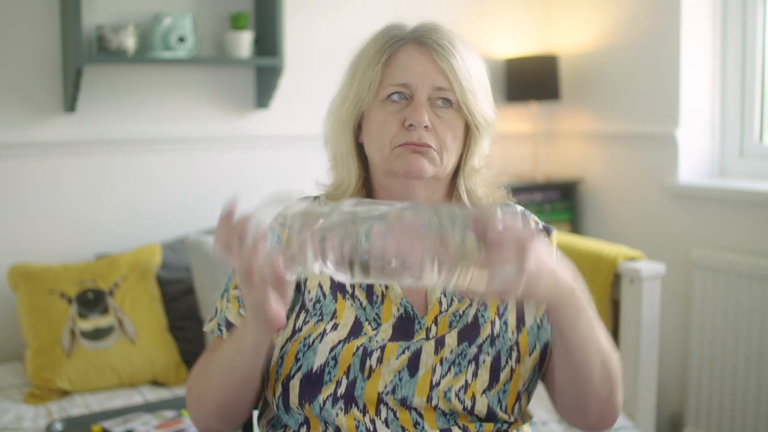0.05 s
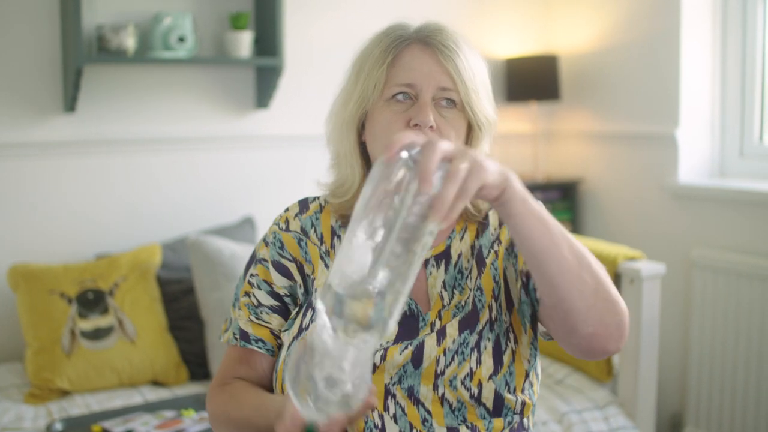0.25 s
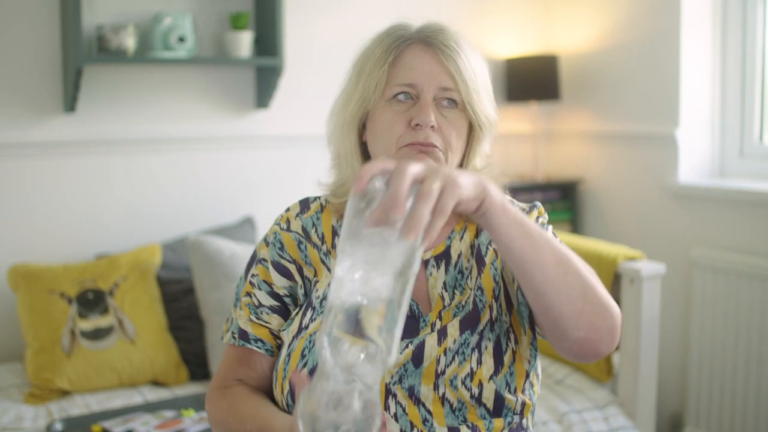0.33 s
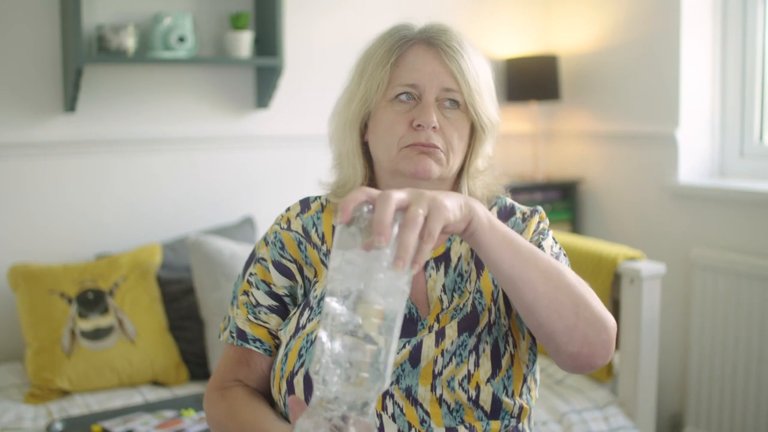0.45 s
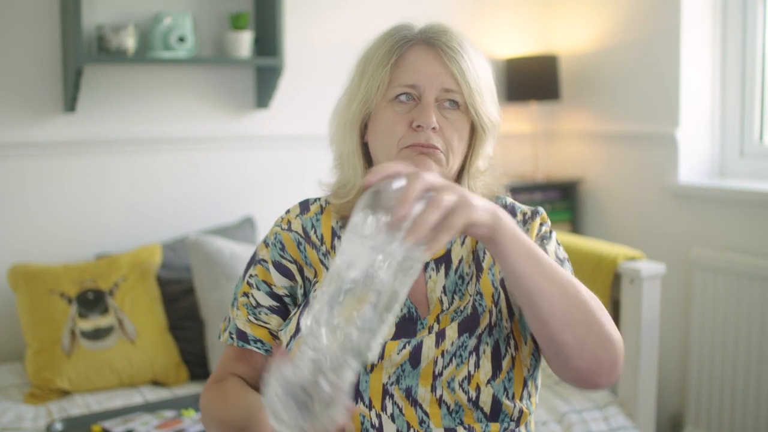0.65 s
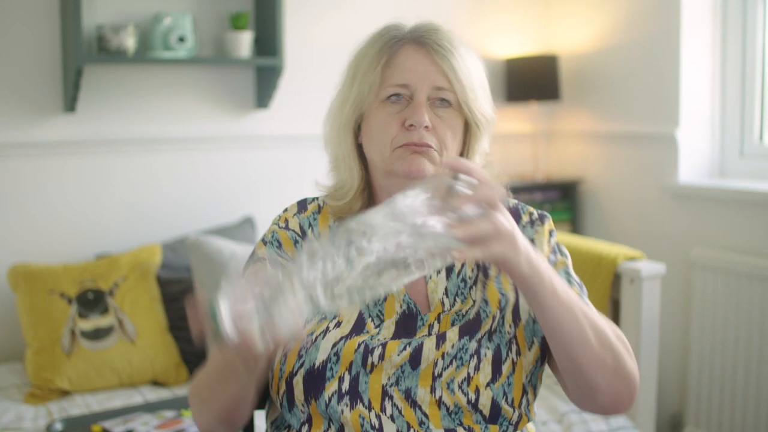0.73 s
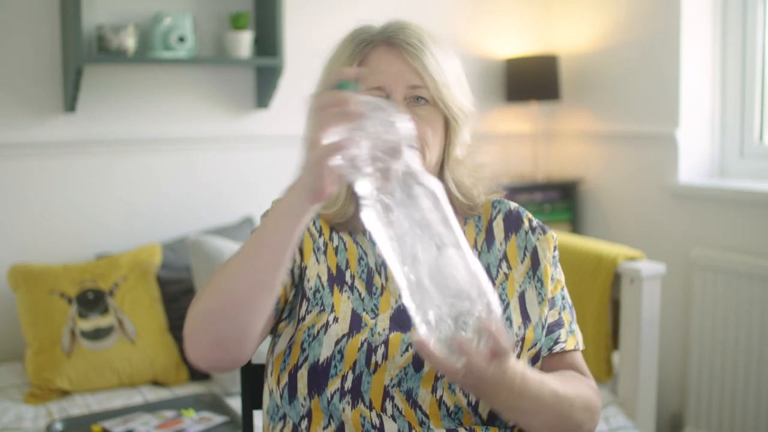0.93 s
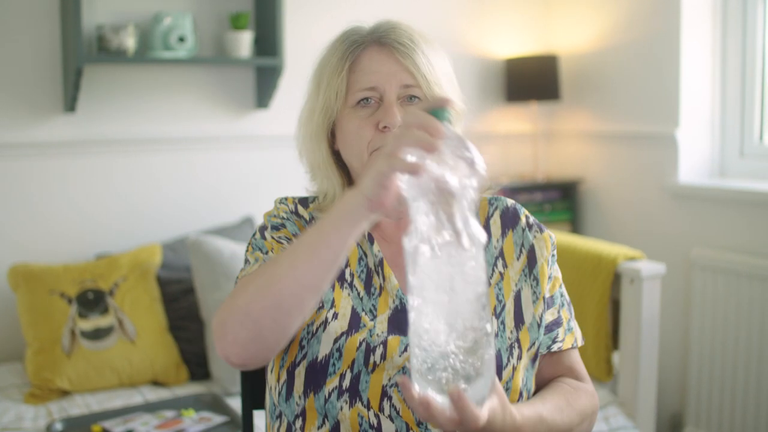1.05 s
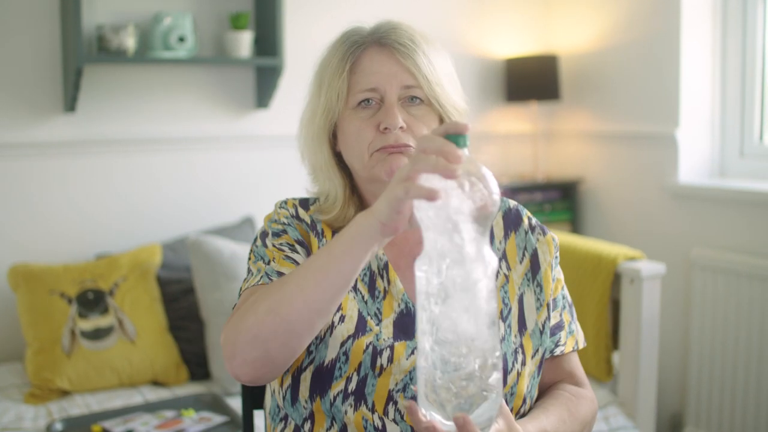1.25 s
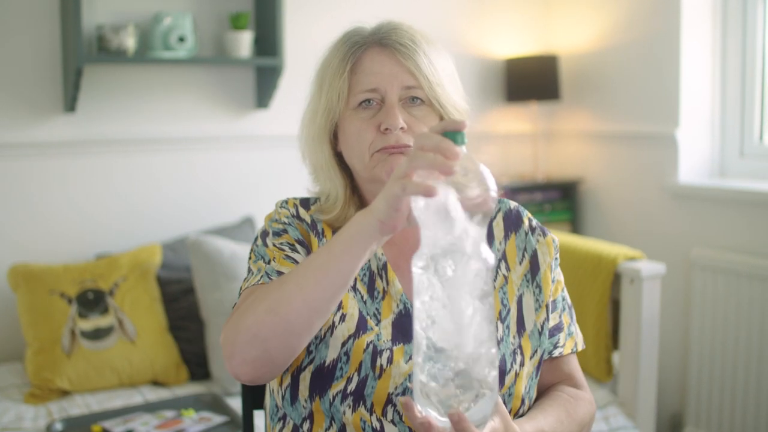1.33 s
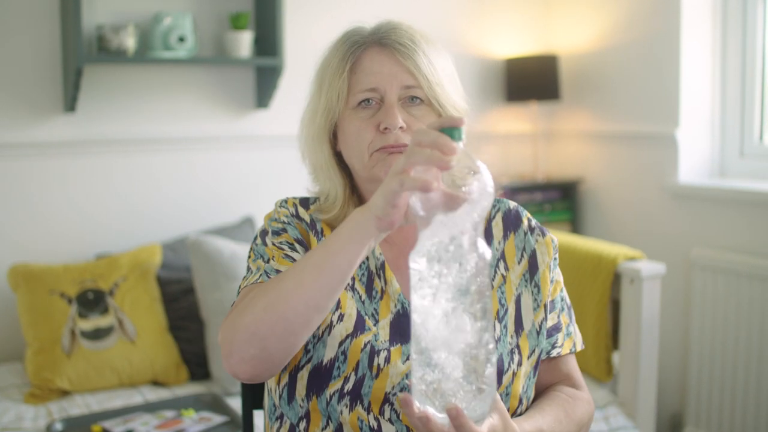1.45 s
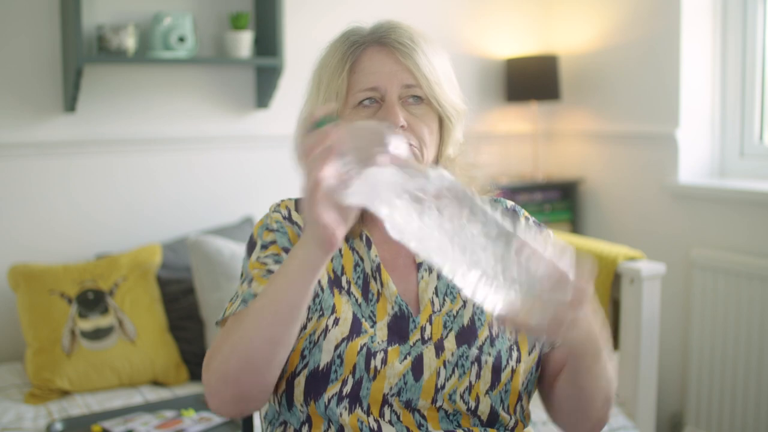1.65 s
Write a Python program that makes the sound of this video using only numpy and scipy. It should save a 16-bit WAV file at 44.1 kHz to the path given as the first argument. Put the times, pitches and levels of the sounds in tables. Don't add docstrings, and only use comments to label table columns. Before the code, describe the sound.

Water surges inside a large flimsy bottle, opening with a strong slosh and loud plastic crack, easing to small bubbles, then surging again in quick bursts before fading to faint room tone, heard close and fairly dry.

```python
import sys
import numpy as np
from scipy import signal
from scipy.fft import rfft, irfft
from scipy.io import wavfile
from scipy.ndimage import uniform_filter1d

SR = 44100
rng = np.random.default_rng(int(sys.argv[2]) if len(sys.argv) > 2 else 0)


def convert_level_to_amplitude(level_db):
    exponent = np.asarray(level_db, float) / 20
    return 10 ** exponent


def persist_wave(psi):
    counts = np.round(np.clip(psi, -1, 1) * 32767).astype(np.int16)
    wavfile.write(sys.argv[1], SR, np.atleast_2d(counts).T)


N = 74970

# (frequency [Hz], level [dB])
WALL_MODES = [(250, -9.5), (322, 3.5), (414, 3), (472, 1), (590, -5.5), (760, -3.5), (960, 2), (1200, 0)]


def evened(x):
    return x / np.sqrt(np.mean(x ** 2) + 1e-20)


def add(mix, s, sound):
    part = mix[max(round(s * SR), 0):][:len(sound)]
    part += sound[:len(part)]


def read(points, hz):
    f, db = np.transpose(points)
    return np.interp(np.log(hz + 1), np.log(f + 1), db)


def coloured(points):
    spectrum = rfft(rng.standard_normal(N))
    gain = convert_level_to_amplitude(read(points, np.fft.rfftfreq(N, 1 / SR)))
    return evened(irfft(spectrum * gain, N))


def band(x, hz, width_hz):
    b, a = signal.iirpeak(hz, hz / width_hz, SR)
    return signal.lfilter(b, a, signal.lfilter(b, a, x))


def ring(hz, t60, rise=0., soft_s=0.0002):
    t = np.arange(4000) / SR
    envelope = (1 - np.exp(-t / soft_s)) * convert_level_to_amplitude(-60 * t / t60)
    creep = 1 + rise * np.minimum(t / t60, 1)
    return envelope * np.sin(2 * np.pi * hz * t * creep)


def train(per_s, spread_db):
    hits = rng.random(N) < per_s / SR
    size = convert_level_to_amplitude(spread_db * np.minimum(rng.exponential(1, N), 3.2))
    return hits * size * rng.choice([-1., 1.], N)


def clumps(db, size):
    wander = uniform_filter1d(uniform_filter1d(rng.standard_normal(N), size), size)
    return convert_level_to_amplitude(db * evened(wander))


def patchy(x):
    patch_db = 2.3
    z = signal.stft(x, nperseg=256, noverlap=192)[2]
    patches = uniform_filter1d(rng.standard_normal(z.shape), size=6, axis=0)
    patches = uniform_filter1d(patches, size=14, axis=1)
    return signal.istft(z * convert_level_to_amplitude(patch_db * evened(patches)), nperseg=256, noverlap=192)[1][:N]


def bump(s, length):
    return np.exp(-(2 * (np.arange(N) / SR - s) / length) ** 2)


def effort(column):
    # (peak time [s], rise [s], fall [s], spray level [dB], level of the weight on the wall [dB])
    surges = [(0.061, 0.14, 0.092, -62, -74), (0.167, 0.028, 0.084, -62, -71),
              (0.21, 0.0054, 0.14, -43.5, -90), (0.264, 0.032, 0.041, -40.5, -37),
              (0.351, 0.0047, 0.054, -59, -41.5), (0.401, 0.0024, 0.033, -52.5, -51),
              (0.463, 0.068, 0.046, -53.5, -48.5), (0.558, 0.0067, 0.072, -60.5, -55.5),
              (0.706, 0.017, 0.043, -60.5, -54), (0.829, 0.042, 0.035, -59.5, -65),
              (0.885, 0.0043, 0.011, -55.5, -62.5), (0.927, 0.01, 0.1, -48, -52.5),
              (1.019, 0.0072, 0.04, -48, -44.5), (1.12, 0.05, 0.057, -48.5, -46),
              (1.189, 0.018, 0.085, -41.5, -44.5), (1.247, 0.014, 0.011, -37, -42.5),
              (1.312, 0.0058, 0.0092, -44, -70), (1.341, 0.0025, 0.019, -47.5, -54),
              (1.404, 0.0023, .01, -45, -53), (1.414, 0.0028, 0.011, -39.5, -45.5),
              (1.431, 0.014, 0.024, -42, -52.5), (1.46, 0.0068, 0.011, -47.5, -58),
              (1.682, 0.22, 0.12, -65, -81)]
    t, power = np.arange(N) / SR, 0
    for row in surges:
        s, rise, fall = row[:3]
        shape = np.exp(np.where(t < s, -2 * ((t - s) / rise) ** 2, (s - t) / fall))
        power = power + (convert_level_to_amplitude(row[column]) * shape) ** 2
    return np.sqrt(power)


def room_tone():
    # (frequency [Hz], level [dB])
    tone_spectrum = [(25, 27), (150, 23), (500, 16), (1000, 11), (2000, 0), (6000, 4), (11000, 1.5),
                     (16000, 2.5)]
    return convert_level_to_amplitude(-69) * coloured(tone_spectrum)


def spray():
    # (frequency [Hz], level [dB])
    spray_spectrum = [(1000, -12), (1500, -8), (2300, -3.5), (3500, -5), (5500, -5.5), (8000, -12),
                      (11000, -28), (15500, -42)]
    drops_per_s, drop_cycles, drop_spread_db = 3600, 7, 2.8
    mist_db, clump_db = -2, 2.0
    drops = np.zeros(N)
    for hz in np.geomspace(1100, 14000, 30):
        drop = ring(hz, drop_cycles * 2 / hz, rise=.15, soft_s=.0004)[:800]
        clicks = train(drops_per_s / 30, drop_spread_db)
        drops += convert_level_to_amplitude(read(spray_spectrum, hz)) * hz * signal.oaconvolve(clicks, drop)[:N]
    mist = coloured([(300, -46)] + list(spray_spectrum))
    fizz = clumps(clump_db, size=200) * (evened(drops) + convert_level_to_amplitude(mist_db) * mist)
    return effort(column=3) * evened(patchy(fizz))


def slosh():
    # (frequency [Hz], level [dB])
    wash_spectrum = [(60, -40), (130, -14), (260, -5), (500, 0), (1000, -3), (1600, -9), (3000, -35)]
    laps_per_s, lap_spread_db, wall_t60_s = 260, 1, .04
    wash_db, clump_db = 6, 2.0
    laps = np.zeros(N)
    for hz, db in WALL_MODES:
        clicks = train(laps_per_s / len(WALL_MODES), lap_spread_db)
        laps += convert_level_to_amplitude(db) * signal.oaconvolve(clicks, ring(hz, wall_t60_s, soft_s=0.00047))[:N]
    wash = coloured(wash_spectrum) * clumps(clump_db, size=500)
    return effort(column=4) * evened(evened(laps) + convert_level_to_amplitude(wash_db) * wash)


def swings():
    # (centre time [s], length [s], gust level [dB], gust frequency [Hz], hiss level [dB])
    swing_events = [(0.182, 0.21, -55.5, 121, -57), (0.06, .1, -65, 45, -65), (1.083, .1, -61, 110, -67),
                    (1.357, 0.24, -67, 89, -64), (0.266, 0.12, -57, 45.4, -64),
                    (0.418, 0.089, -60.5, 81, -86), (0.613, 0.52, -71, 79.6, -66),
                    (0.832, 0.18, -57, 89.5, -65.5), (0.956, 0.089, -51, 87, -55.5),
                    (1.22, 0.1, -49.5, 144, -72), (1.694, .12, -61.5, 93, -64)]
    # (frequency [Hz], level [dB])
    hiss_spectrum = [(4000, 9.5), (8000, 5.5), (12000, 0.5), (16000, -10)]
    out, hiss = np.zeros(N), coloured(hiss_spectrum)
    for s, length, db, hz, hiss_db in swing_events:
        swell = bump(s, length)
        gust = band(rng.standard_normal(N), hz, hz * 1.6)
        gust = gust * np.linalg.norm(swell) / np.linalg.norm(swell * gust)
        out += swell * (convert_level_to_amplitude(db) * gust + convert_level_to_amplitude(hiss_db) * hiss)
    return out


def sleeve():
    brush = evened(band(rng.standard_normal(N), 1940, width_hz=370))
    return convert_level_to_amplitude(-60.5) * bump(.083, length=.081) * brush


def snaps():
    # (time [s], peak level [dB], ring frequency [Hz], crack share [0-1])
    dull_snaps = [(0.189, -33.5, 3670, 0.93), (0.349, -16.5, 2520, 0.22), (0.4, -32.5, 2370, 0.6),
                  (0.4587, -30, 3380, 0.2), (0.4857, -33, 3260, 0.7), (0.5341, -32.5, 3320, 0.8),
                  (0.7154, -44, 3470, 0.9), (0.909, -30.5, 4200, 0.88), (1.1761, -21, 2010, 0.32),
                  (1.1877, -27, 3370, 0.3), (1.4024, -33, 3230, 0.3), (1.4103, -26.5, 3500, 0.15),
                  (1.6107, -47.5, 2570, 0.04)]
    # (time [s], peak level [dB], ring frequency [Hz], crack share [0-1])
    bright_snaps = [(.205, -26.5, 5700, 0.3), (.2122, -20, 8200, 0.07), (.2555, -25, 6300, 0.54),
                    (.2955, -22.5, 4630, 0.33), (.5338, -25, 8960, 0.18), (.5527, -38, 1480, 1),
                    (.629, -30, 5350, 0.16), (.6775, -38, 5070, 0.43), (.7, -25.5, 5300, 0.13),
                    (.847, -40.5, 6260, 0.93), (.962, -34, 5400, 0), (.976, -30.5, 5300, 0.2),
                    (1.0138, -34, 5250, 0.1), (1.2045, -25.5, 8240, 0.2), (1.229, -29.5, 9800, 0),
                    (1.3695, -32, 6360, 0.05), (1.5565, -41.5, 8550, 0.2)]
    # (time [s], peak level [dB], ring
    # frequency [Hz], crack share [0-1])
    droplet_ticks = [(.2275, -29, 6800, .15), (.228, -35.5, 1840, .2), (.2595, -43, 2130, 1),
                     (.27, -28, 6500, 0.33), (.2775, -47, 9000, 0.7), (.288, -42, 13500, 0.9),
                     (.3495, -24, 1170, 0.87), (.371, -42, 8500, 0.55), (.424, -47, 5200, 0.34),
                     (.4495, -33, 2980, 0.3), (.464, -35, 3960, 0), (.5275, -48, 3200, 1),
                     (.546, -45, 3400, .3), (.563, -40, 2300, 0.4), (.567, -43, 4500, 0.6),
                     (.578, -42.5, 2200, 0.7), (.59, -47, 2200, 0), (.6295, -43.5, 2020, 1),
                     (.676, -43, 2070, 0.8), (.688, -43, 3400, 0.2), (.6995, -36, 3070, 0.97),
                     (.884, -55, 2500, .9), (.9097, -40, 9500, 1), (1.295, -49, 3100, 0.3),
                     (1.338, -40, 7700, 0.6), (1.343, -41.5, 5530, 1), (1.352, -45, 7100, 0.2),
                     (1.365, -43, 6300, 0.5), (1.371, -43, 3340, 0.39), (1.377, -39, 6450, .2),
                     (1.4035, -34.5, 5760, 0.5), (1.411, -30.5, 6100, 0.42), (1.4165, -40, 7400, 0.6),
                     (1.496, -48, 3200, .8)]
    ring_cycles, crack_width = 10.2, 0.83
    crack_s, rattle_s, rattle_db = .001, .007, -12
    out, t = np.zeros(N), np.arange(1500) / SR
    decay = np.exp(-t / crack_s) + convert_level_to_amplitude(rattle_db) * np.exp(-t / rattle_s)
    for s, db, hz, crack in list(dull_snaps) + list(bright_snaps) + list(droplet_ticks):
        share = np.clip(crack, 0, 1)
        burst = band(rng.standard_normal(len(t)) * decay, hz, hz * crack_width)
        burst /= abs(burst).max()
        tone = 1.5 * ring(hz, ring_cycles * 2 / hz, soft_s=.0004)[:len(t)]
        add(out, s, convert_level_to_amplitude(db) * (share * burst + (1 - share) * tone))
    return out


def slaps():
    # (time [s], peak level [dB], frequency [Hz], t60 [s])
    slap_events = [(0.207, -41.5, 243, 0.19), (0.261, -23, 676, 0.041), (0.379, -35, 288, 0.038),
                   (0.401, -32.5, 510, 0.03), (0.438, -37, 548, 0.046), (0.82, -46, 337, 0.093),
                   (1.009, -29.5, 461, 0.058), (1.022, -30, 520, 0.061), (1.032, -28, 308, 0.036),
                   (1.179, -40, 486, 0.22), (1.252, -34, 482, 0.043), (1.333, -39.5, 1014, 0.027),
                   (1.405, -42.5, 429, 0.074), (1.637, -56, 309, 0.17), (1.677, -43.5, 407, 0.021)]
    # (time [s], peak level [dB], frequency [Hz], t60 [s])
    hard_slap = (.3482, -23, 820, .035)
    partner_ratio, partner_db, body_db = 1.6, -1, -7.5
    out = np.zeros(N)
    for s, db, hz, t60 in list(slap_events) + [hard_slap]:
        detune = rng.uniform(.95, 1.05, len(WALL_MODES))
        body = sum(convert_level_to_amplitude(d) * ring(f * k, t60, soft_s=0.002) for (f, d), k in zip(WALL_MODES, detune))
        boom = ring(hz, t60, soft_s=0.00071)
        partner = ring(hz * partner_ratio, t60 * 0.61)
        add(out, s, convert_level_to_amplitude(db) * 0.5 * (boom + convert_level_to_amplitude(partner_db) * partner + convert_level_to_amplitude(body_db) * body))
    return out


def glugs():
    # (time [s], peak level [dB], frequency [Hz], t60 [s], climb [share])
    glug_events = [(.2635, -20, 707, 0.015, 0.04), (.2105, -41.5, 171, 0.094, 0.04),
                   (.441, -37.5, 465, 0.031, 0.041), (.577, -43, 1050, 0.032, 0.086),
                   (.6555, -37, 696, 0.058, 0.44), (.656, -46, 431, 0.13, 0.22),
                   (.716, -52.5, 490, 0.062, 0.14), (.728, -46, 823, 0.098, 0.015),
                   (.739, -48.5, 1457, 0.04, .03), (1.309, -39, 1560, 0.025, .05),
                   (1.482, -50, 615, 0.028, 0.054)]
    rough_db = 1
    out = np.zeros(N)
    for s, db, hz, t60, climb in glug_events:
        gulp = ring(hz, t60, rise=climb, soft_s=.0012) * clumps(rough_db, size=120)[:4000]
        add(out, s, convert_level_to_amplitude(db) * 1.3 * gulp)
    return out


def bubbles():
    # (time [s], peak level [dB], frequency [Hz])
    bubble_events = [(.2165, -26.5, 3270), (.2615, -18.5, 2120), (.279, -20, 3260), (.558, -35, 3450),
                     (.747, -39, 2680), (.926, -36, 2160), (.9355, -28, 3580), (.939, -41, 1320),
                     (.9432, -25.5, 3250), (1.017, -34.5, 2440), (1.081, -35.5, 1520), (1.2155, -35, 1290),
                     (1.2525, -21.5, 2300), (1.3105, -30.5, 2040), (1.332, -37, 1205), (1.4235, -27, 3450)]
    # (time [s], peak level [dB], frequency [Hz])
    tiny_bubbles = [
        (.582, -44, 7900),
        (.6, -40, 4020),
        (.689, -52, 4570),
        (.7165, -43, 4500),
        (.733, -54, 3100),
        (.989, -34, 7600),
        (1.385, -37, 5100),
    ]
    ping_cycles, ping_rise = 9.5, 0.014
    out = np.zeros(N)
    for s, db, hz in list(bubble_events) + list(tiny_bubbles):
        ping = ring(hz, ping_cycles * 2 / hz, rise=ping_rise, soft_s=.0006)
        add(out, s, convert_level_to_amplitude(db) * 1.3 * ping)
    return out


def airy_spray():
    # (centre time [s], length [s], level [dB])
    puffs = [
        (.225, 0.044, -61),
        (.272, 0.064, -60),
        (0.926, .025, -64),
    ]
    # (frequency [Hz], level [dB])
    air_spectrum = [(5000, -28), (8000, 2), (12000, -2), (16000, -5)]
    swell = sum(convert_level_to_amplitude(db) * bump(s, length) for s, length, db in puffs)
    return coloured(air_spectrum) * clumps(2.0, size=100) * swell


def heaves():
    # (centre time [s], length [s], level [dB], frequency [Hz])
    heave_events = [
        (0.251, .06, -54, 33),
        (0.271, 0.037, -49.5, 122),
        (0.849, 0.039, -48, 56.7),
        (.953, 0.037, -42, 60),
        (1.172, 0.041, -56, 37.8),
        (1.24, 0.043, -49.5, 152),
    ]
    t, out = np.arange(N) / SR, np.zeros(N)
    for s, length, db, hz in heave_events:
        out += convert_level_to_amplitude(db) * bump(s, length) * np.sin(2 * np.pi * hz * (t - s))
    return out


def room(x):
    t60_s, top_hz, gap = .16, 5000, 22
    taps = np.zeros(SR // 2)
    at = np.arange(200, len(taps) - gap, gap)
    taps[at + rng.integers(0, gap, len(at))] = rng.choice([-1., 1.], len(at))
    taps *= convert_level_to_amplitude(-60 * np.arange(len(taps)) / SR / t60_s)
    taps = signal.lfilter(*signal.butter(1, top_hz, fs=SR), taps)
    return signal.fftconvolve(x, taps / np.linalg.norm(taps))[:N]


def scene():
    bottle = spray() + slosh() + snaps() + slaps() + glugs() + bubbles()
    motion = swings() + sleeve() + airy_spray() + heaves()
    mix = room_tone() + bottle + convert_level_to_amplitude(-19) * room(bottle) + motion
    return mix[None]


def low_pass(x):
    return signal.sosfilt(signal.butter(12, 16470, fs=SR, output="sos"), x)


def record(dry):
    edge = signal.firwin(255, 15950, window=("kaiser", 8), fs=SR)
    mix = signal.oaconvolve(dry, edge[None], "same")
    return low_pass(mix)


dry = scene()
out = record(dry)
persist_wave(out)
```